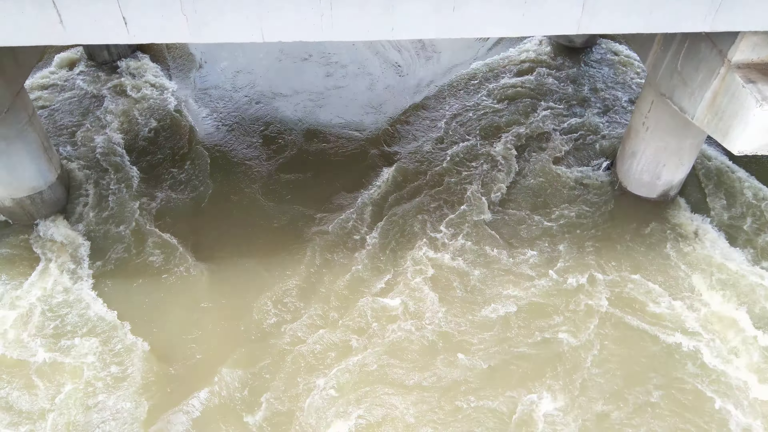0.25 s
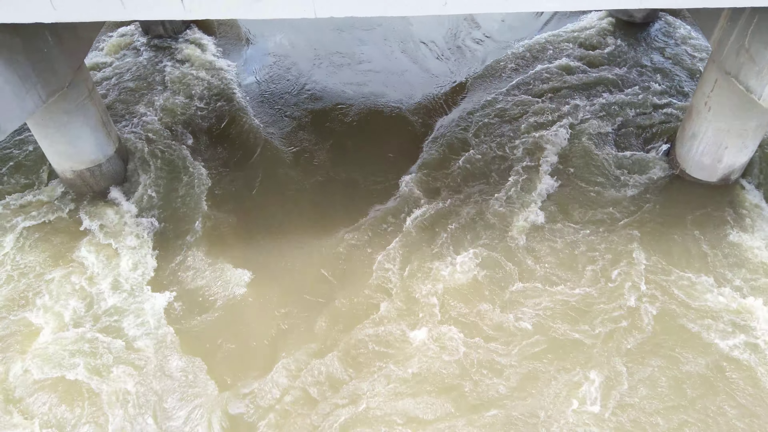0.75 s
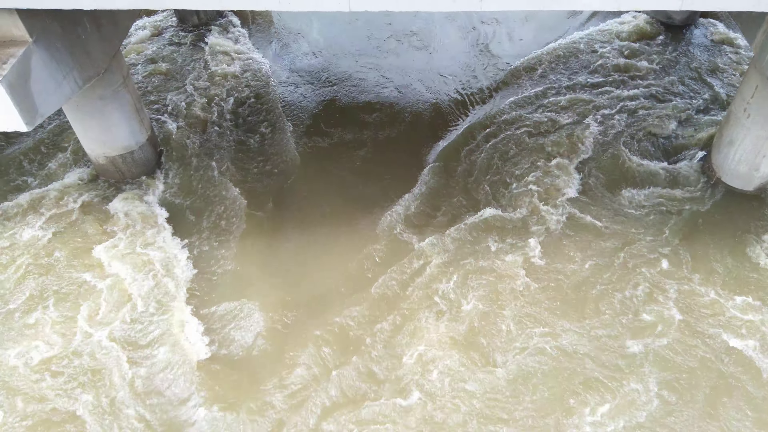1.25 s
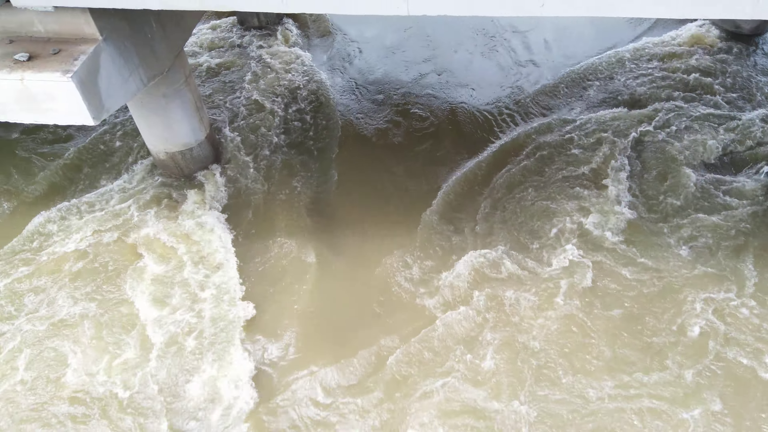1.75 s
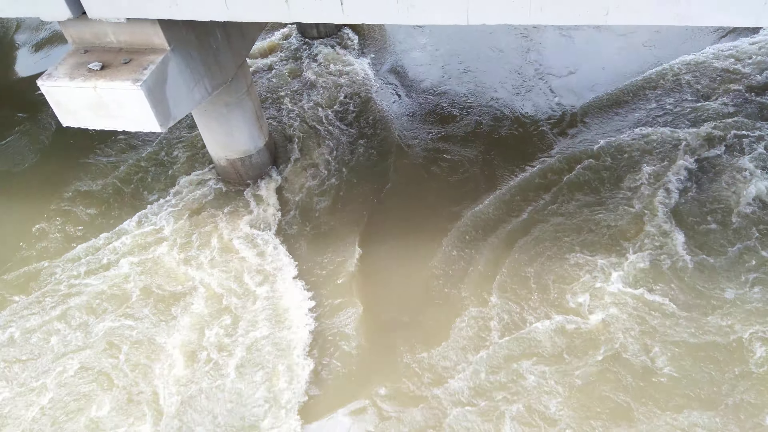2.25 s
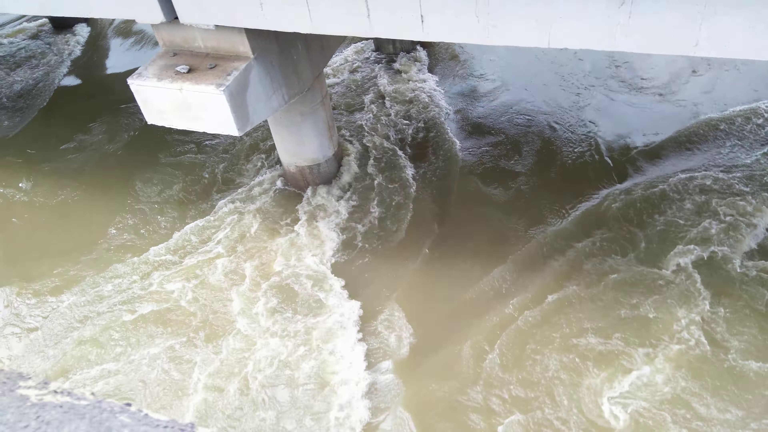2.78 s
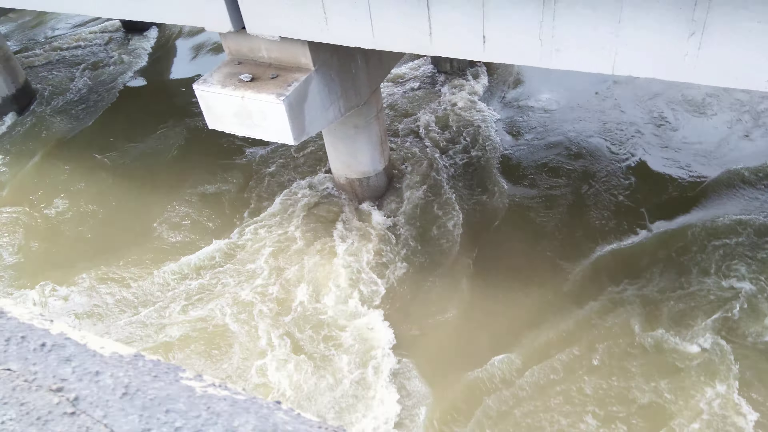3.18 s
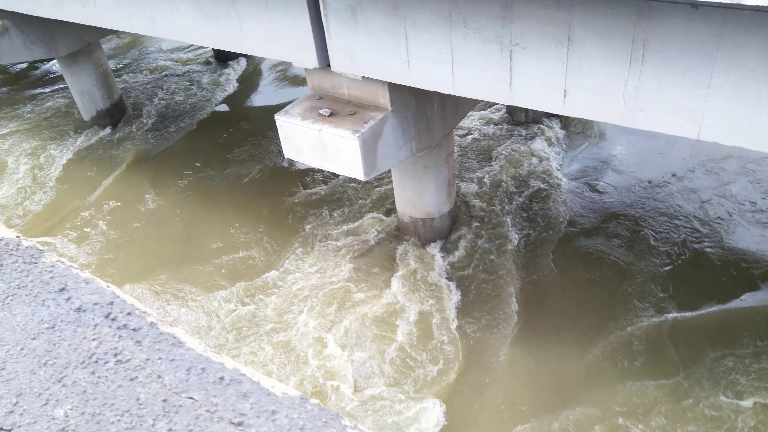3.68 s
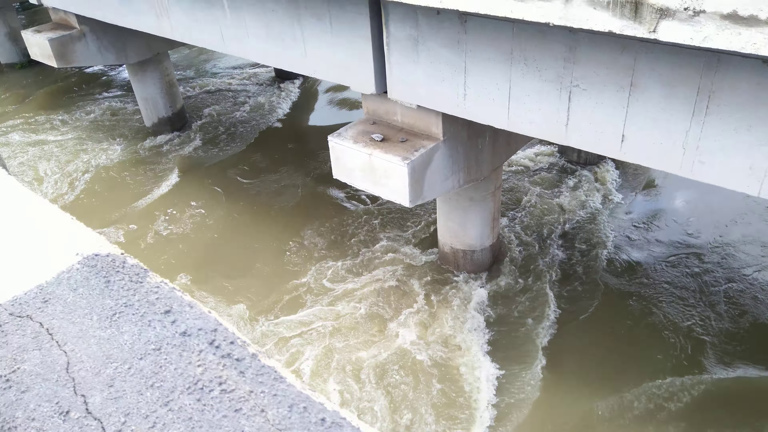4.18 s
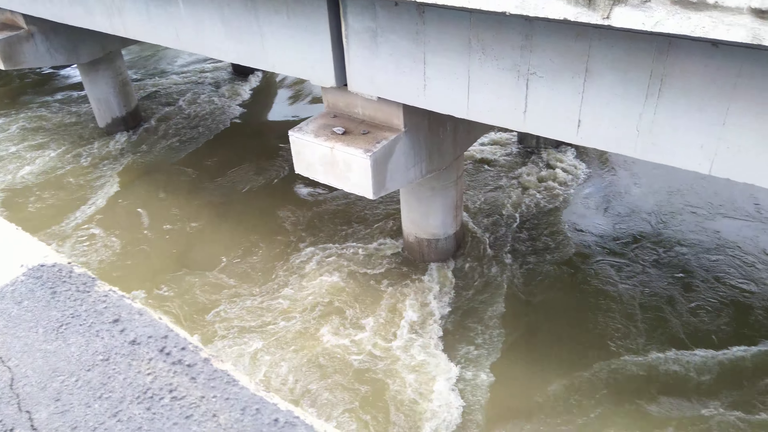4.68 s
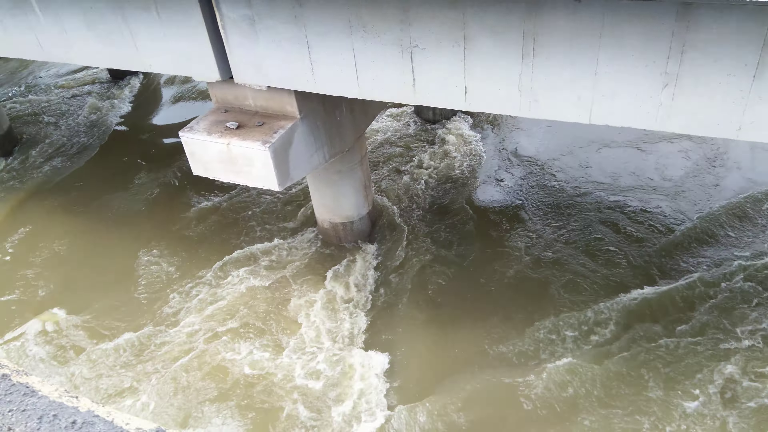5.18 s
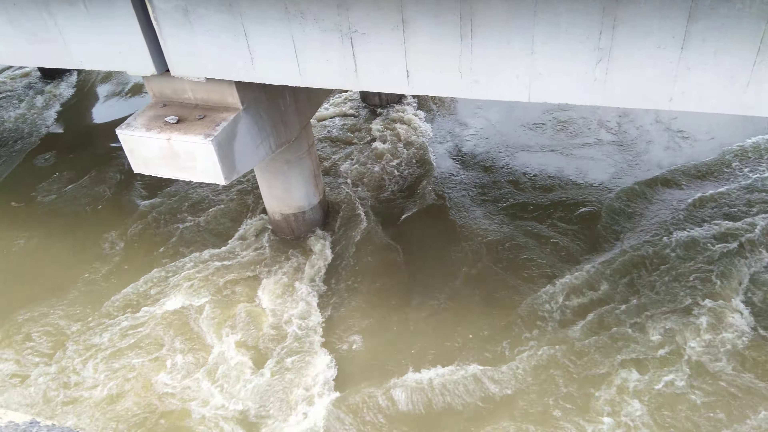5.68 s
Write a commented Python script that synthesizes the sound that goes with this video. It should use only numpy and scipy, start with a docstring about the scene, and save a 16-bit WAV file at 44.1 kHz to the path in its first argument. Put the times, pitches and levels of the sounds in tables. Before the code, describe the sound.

A constant, dense rush of floodwater fills the whole six seconds, heard in mono from a bridge deck above: a low throbbing roar beneath a thick midrange hiss, with pattering spray and small gurgling bubbles. In the first 0.2 s a few faint, thin metal clinks touch, and one more sounds at about 1.1 s. Wind rumbles low throughout, wavering. Short, bassy gusts buffet the microphone at about 0.7-0.9 s, cluster from 1.5 to 2.1 s, and return around 2.4-2.7 s; the stronger ones momentarily push the river down. The wind fades near 3.7 s, picks up around 4 s, and thuds singly until 5 s. Hollow sloshes rise softly at 0.5, 1.4, 1.8, 2.3 and 2.9 s, with a light splash near 0.8 s. From about 5 s the wind is low, and the foam shifts subtly in colour as the microphone faces one pier's wake, with small sloshes and sprays until the end.

```python
"""Floodwater churns between concrete bridge piers, heard from the deck above in mono.
Throughout: roar of bubble clouds under whitewater hiss, bubbles, spray; wavering wind, dropping and returning.
Metal clinks faintly in the first 0.2 s and once after 1.1 s; toppling waves come from 0.5 s on.
Gusts buffet the microphone from 0.7 to 5 s; where they drive the limiter, the river ducks.
Late on, the microphone turns to the wake of one pier and the foam changes colour."""
import sys
import numpy as np
from scipy import signal
from scipy.fft import rfft, irfft
from scipy.io import wavfile
from scipy.ndimage import uniform_filter1d

SR = 44100
rng = np.random.default_rng(int(sys.argv[2]) if len(sys.argv) > 2 else 0)


def dump_mix(stems):
    """Bounce the given channels to the path in sys.argv[1] as a 16-bit WAV at rate SR."""
    frames = np.atleast_2d(stems).T  # one column per channel
    limited = np.clip(frames, -1, 1)  # hard clip at full scale
    pcm = np.round(limited * 32767).astype(np.int16)
    wavfile.write(sys.argv[1], SR, pcm)


N = 261513
TIME = np.arange(N) / SR  # s

# Levels are relative; each layer adds its own gain.
# metal touching: [t/s, level/dB, tilt/dB per octave]
CLINKS = [(.089, -19.5, 1), (.103, -18.5, 0), (.162, -21.5, -3), (.195, -29, 3), (1.137, -16, -7)]
# ring modes of the metal: [f/Hz, level/dB, t60/s]
METAL_MODES = [(2166, -5, .1), (2950, -4, 0.22), (3070, -2, .15), (3770, -9, .08), (4720, 4, 0.093),
               (5650, -3, 0.13), (6670, -4, 0.13), (7440, -7.5, .28), (7740, -4, 0.16)]
# wind strength, dropping and picking up once more: [t/s, level/dB]
BREEZE = [(0, -14.5), (.3, -11.5), (.7, -13), (1, -10), (2.35, -10), (2.85, -13.5), (3.28, -15),
          (3.72, -24.5), (4.05, -11.5), (4.35, -22), (5.93, -19)]
# gusts on the microphone: [centre t/s, peak level/dB, length/s, eddy f/Hz]
GUSTS = [(.695, -10.5, .05, 110), (0.835, -2.5, 0.066, 140), (0.884, -7.5, 0.068, 110),
         (1.487, -2, 0.06, 169), (1.53, -5, 0.078, 197), (1.62, -6, 0.051, 160), (1.734, -8, 0.11, 105),
         (1.85, -7, 0.13, 130), (2.01, -12, .05, 101), (2.072, -11.5, 0.031, 110), (2.438, -8, 0.067, 110),
         (2.485, -7, 0.072, 110), (2.67, -8, .04, 121), (3.19, -9, 0.12, 69.6), (3.893, -8.5, 0.0385, 110),
         (3.955, -10.5, .1, 130), (4.195, -5, 0.054, 75), (4.524, -9, 0.051, 90), (4.835, -4, 0.07, 65),
         (4.865, -9, .045, 60), (5.01, -9.5, 0.059, 70)]
# wind rumble spectrum shape: [f/Hz, level/dB per Hz]
WIND_SPECTRUM = [(20, 2.5), (35, -16), (60, -2.5), (100, 1.5), (160, -4), (240, -8), (400, -21), (900, -29),
                 (3000, -70)]
# toppling waves, low slosh or high splash: [centre t/s, peak level/dB, length/s, centre f/Hz]
WAVES = [(0.497, -23, 0.11, 353), (0.775, -25, 0.076, 3300), (1.441, -15, 0.11, 336),
         (1.818, -14.5, 0.065, 343), (2.301, -21.5, 0.26, 225), (2.9, -24, .15, 400),
         (5.247, -20, .13, 440), (5.391, -23, 0.14, 440), (5.529, -20.5, .035, 2300),
         (5.661, -26, .2, 3770)]
# river, microphone turning from middle channel (0) to pier wake (1): [t/s, level/dB, turn/0-1]
RIVER = [(0, -25.5, 0), (.5, -24.5, 0), (1.35, -23, 0), (1.7, -24.5, 0), (2.5, -24.7, 0.1),
         (2.9, -23, 0.15), (4.5, -23.8, .3), (5.1, -23.3, 1), (5.93, -22.5, 1)]
# foam spectrum shape: [f/Hz, level/dB per Hz]
FOAM_SPECTRUM = [(400, -13), (1220, -7.5), (1730, 0), (2330, -3.5), (2850, -1.5), (3350, -6), (3950, -3),
                 (4550, -5.5), (4950, -5.5), (5700, -6.5), (7000, -10), (7500, -10.5), (8300, -23.5)]
# foam colour change with the microphone turned: [f/Hz, gain/dB]
TURNED_GAIN = [(1000, 1.5), (1450, 1.9), (2000, 0), (2800, 0), (4200, -1), (5700, -3), (7000, 1),
               (7900, 3.5)]
# roar spectrum shape: [f/Hz, level/dB per Hz]
ROAR_SPECTRUM = [(20, -23.5), (55, -6.5), (100, -2), (160, 1), (240, -3), (320, -2.5), (400, -7.5),
                 (650, -9), (950, -11.5), (1200, -20.5), (2000, -54)]

WAVER_DB, WAVER_S = 1.07, 0.06  # chance wavering of the breeze: rms depth, averaging time
SURGE_DB, SURGE_S = -7.5, 0.18  # breeze swell under a gust: level re gust peak, length
FOAM_DB, FACING_WAKE_DB = 1.08, 0.5  # foam gain re river level; extra at full turn
CEILING = 0.85  # full scale = 1
EDGE_HZ = 8450


def gain_of(db):
    """Decibels to amplitude."""
    return 10 ** (np.asarray(db) / 20)


def evened(x):
    """Scales to rms 1."""
    return x / np.sqrt(np.mean(x ** 2) + 1e-20)


def read(points, hz):
    """Interpolates a dB table linearly over log frequency."""
    f, db = np.transpose(points)
    return np.interp(np.log(hz + 1), np.log(f + 1), db)


def filtered(x, spectrum):
    """Applies a table of gains in dB."""
    hz = np.fft.rfftfreq(len(x), 1 / SR)
    return irfft(rfft(x) * gain_of(read(spectrum, hz)), len(x))


def coloured(x, spectrum):
    """Filters by a spectrum table, then scales to rms 1."""
    return evened(filtered(x, spectrum))


def curves(rows):
    """Each column of a time table at every sample."""
    s, *columns = np.transpose(rows)
    return [np.interp(TIME, s, column) for column in columns]


def add(mix, s, sound):
    """Mixes a sound in from time s, in place."""
    part = mix[max(round(s * SR), 0):][:len(sound)]
    part += sound[:len(part)]


def even_flow(noise, size):
    """Divides noise by its running rms over size samples, removing chance swells."""
    return noise / np.sqrt(abs(uniform_filter1d(noise ** 2, size)) + 1e-6)


def swell(length_s):
    """Half-sine rise and fall."""
    return np.sin(np.linspace(0, np.pi, int(length_s * SR)))


def puff(hz, length_s, slope_db):
    """One swell of band noise, down slope_db * octaves squared away from hz."""
    octaves = np.log2((np.fft.rfftfreq(SR, 1 / SR) + 1) / hz)
    band_gain = gain_of(-slope_db * octaves ** 2)
    noise = evened(irfft(rfft(rng.standard_normal(SR)) * band_gain))
    arch = swell(length_s)
    return arch * even_flow(noise, size=900)[:len(arch)]


def churn(spectrum, patchy_db, patch_s, patch_hz, surge_db):
    """Noise with random swelling patches in time and pitch, plus small surges of the whole."""
    size, hop = 512, 128
    frames, hz = N // hop + 5, np.fft.rfftfreq(size, 1 / SR)
    real, imag, patches = rng.standard_normal((3, frames, len(hz)))
    span = max(round(patch_s * SR / hop), 1)  # frames
    width = max(round(patch_hz * size / SR), 1)  # bins
    patches = uniform_filter1d(patches, span, axis=0)
    patches = evened(uniform_filter1d(patches, width, axis=1))
    surge = evened(uniform_filter1d(rng.standard_normal(frames), span))[:, None]
    field = (real + 1j * imag) * gain_of(patchy_db * patches + surge_db * surge)
    noise = signal.istft(field.T, nperseg=size, noverlap=size - hop)[1][:N]
    return coloured(noise, spectrum)


def grains(low_hz, high_hz, cycles, rise, per_s, spread_db, count=32):
    """Random damped rings, rising in pitch; each decays to 1/e in the given number of cycles."""
    out = np.zeros(N)
    for hz in np.geomspace(low_hz, high_hz, count):
        age = np.arange(int(5 * cycles / hz * SR)) / SR * hz / cycles  # in decay times
        tone = np.sin(2 * np.pi * cycles * age * (1 + rise * age / 2))
        ring = tone * np.exp(-age) * (1 - np.exp(-8 * age))
        births = rng.random(N) < per_s / count / SR
        sizes = gain_of(spread_db * np.minimum(rng.exponential(1, N), 4))  # a few stand out
        out += signal.oaconvolve(births * sizes, ring / np.linalg.norm(ring))[:N]
    return out


def clinks(scrape_decay_s=0.0194, scrape_db=-1, centre_hz=4700):
    """Small metal pieces touch: brief scraping rattle over a thin ring of damped modes."""
    out, t = np.zeros(N), np.arange(SR // 3) / SR
    onset = 1 - np.exp(-t / 0.001)
    for s, level_db, tilt_db in CLINKS:
        ring = np.zeros(len(t))
        for hz, mode_db, t60_s in METAL_MODES:
            decay_db = mode_db + tilt_db * np.log2(hz / centre_hz) - 60 * t / t60_s
            ring += gain_of(decay_db) * np.sin(2 * np.pi * (hz * t + rng.random())) / 2
        scrape_spectrum = [(1000, -35.0), (2400, -tilt_db), (4800, 11), (8000, tilt_db + 4.5)]
        scrape = coloured(rng.standard_normal(len(t)), scrape_spectrum)
        scrape = gain_of(scrape_db) * scrape * np.exp(-t / scrape_decay_s)
        add(out, s, gain_of(level_db) * onset * (ring + scrape))
    return out


def wind(breeze_db=-2, eddies_db=-4.0, eddy_slope_db=5):
    """Air rumbles over the microphone; gusts press on the diaphragm and shed eddies."""
    level_db, = curves(BREEZE)
    waver = uniform_filter1d(rng.standard_normal(N), max(round(WAVER_S * SR), 1))
    waver_db = WAVER_DB * evened(waver)
    surges, blows = np.zeros(N), np.zeros(N)
    for s, peak_db, length_s, eddy_hz in GUSTS:
        # push too slow to hear, but it drives the limiter
        push = swell(length_s)
        eddies = gain_of(eddies_db) * puff(eddy_hz, length_s, eddy_slope_db)
        add(blows, s - length_s / 2, gain_of(peak_db) * (push + eddies))
        add(surges, s - SURGE_S / 2, gain_of(peak_db + SURGE_DB) * swell(SURGE_S))
    flow = np.maximum(gain_of(level_db + waver_db), surges)
    rumble = even_flow(coloured(rng.standard_normal(N), WIND_SPECTRUM), size=2500)
    return gain_of(breeze_db) * flow * rumble + blows


def waves(slosh_slope_db=26, splash_slope_db=9):
    """A toppling crest traps air that booms in a narrow band, or scatters into wide spray."""
    out = np.zeros(N)
    for s, peak_db, length_s, hz in WAVES:
        slope_db = slosh_slope_db if hz < 1000 else splash_slope_db
        add(out, s - length_s / 2, gain_of(peak_db) * puff(hz, length_s, slope_db))
    return out


def whitewater(hiss_db=1, spray_db=-4.5):
    """Bursting foam hisses, falling spray patters; colour shifts as the microphone turns."""
    level_db, turn = curves(RIVER)
    hiss = churn(FOAM_SPECTRUM, patchy_db=0.42, patch_s=0.062, patch_hz=500, surge_db=0.2)
    drops = grains(1095.0, 7840, cycles=6.7, rise=0.028, per_s=2200, spread_db=1.5)
    spray = coloured(drops, FOAM_SPECTRUM)
    foam = gain_of(hiss_db) * hiss + gain_of(spray_db) * spray
    foam_level_db = level_db + FOAM_DB + FACING_WAKE_DB * turn
    return gain_of(foam_level_db) * ((1 - turn) * foam + turn * filtered(foam, TURNED_GAIN))


def roar(body_db=5.5, bubbles_db=-8):
    """Large air clouds throb in the wake of the piers; single bubbles gurgle at the surface."""
    level_db, _ = curves(RIVER)
    clouds = churn(ROAR_SPECTRUM, patchy_db=0.74, patch_s=0.083, patch_hz=170, surge_db=0.05)
    rings = grains(327.3, 1304, cycles=11, rise=0.043, per_s=290, spread_db=5.0)
    bubbles = coloured(rings, ROAR_SPECTRUM)
    return gain_of(level_db) * (gain_of(body_db) * clouds + gain_of(bubbles_db) * bubbles)


def scene():
    """Sums all sources at one microphone, fed to both channels."""
    mono = clinks() + wind() + waves() + whitewater() + roar()
    return np.array([mono, mono])


def record(dry, threshold_db=-10.0, release_s=0.049, low_cut_hz=44, treble_hz=7650):
    """Fast-clamping, slow-release limiter; then low cut, rounded peaks and treble edge."""
    power = uniform_filter1d((dry ** 2).mean(0), size=450)
    power_db = 10 * np.log10(abs(power) + 1e-12)
    over_db = np.maximum(power_db - threshold_db, 1e-6)
    # each dB excess dies away exponentially unless a larger one takes over
    held_log = np.maximum.accumulate(np.log(over_db) + TIME / release_s)
    held_db = np.exp(held_log - TIME / release_s)
    limited = dry * gain_of(-uniform_filter1d(held_db, size=150))
    low_cut = signal.butter(4, low_cut_hz, "high", fs=SR, output="sos")
    thinned = signal.sosfilt(low_cut, limited)
    rounded = thinned / (1 + (thinned / CEILING) ** 8) ** (1 / 8)
    dulled = signal.sosfilt(signal.butter(18, treble_hz, fs=SR, output="sos"), rounded)
    low_pass = signal.firwin(601, EDGE_HZ, window=("kaiser", 9), fs=SR)
    return signal.oaconvolve(dulled, low_pass[None], "same", axes=1)


dry = scene()
out = record(dry)
dump_mix(out)
```